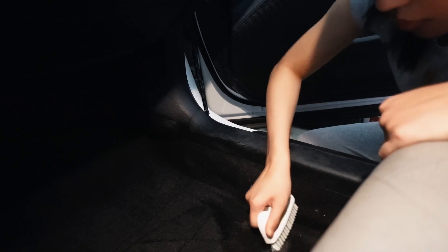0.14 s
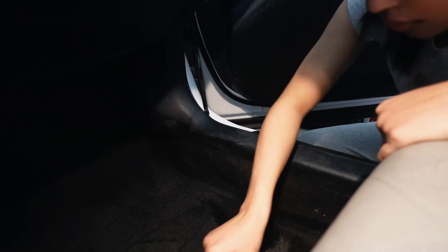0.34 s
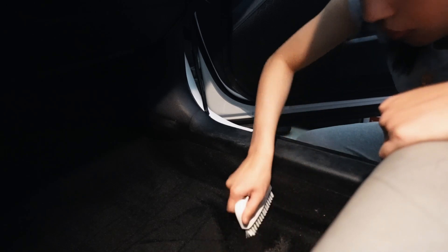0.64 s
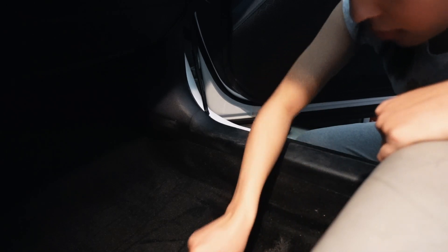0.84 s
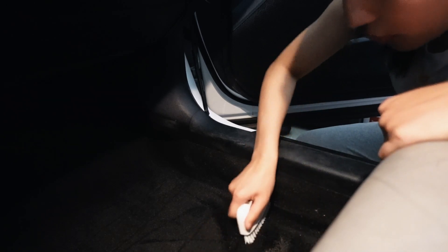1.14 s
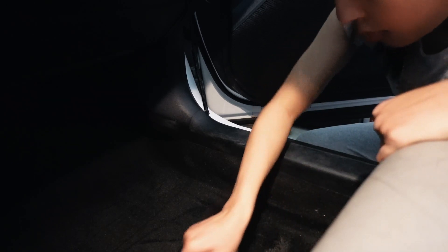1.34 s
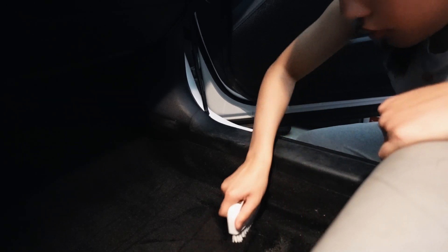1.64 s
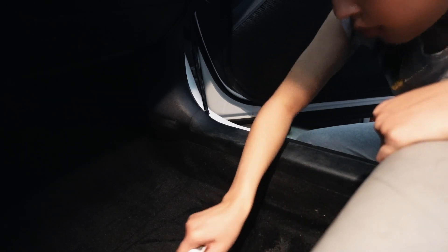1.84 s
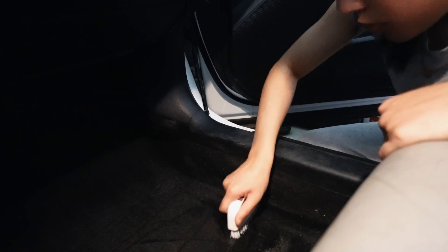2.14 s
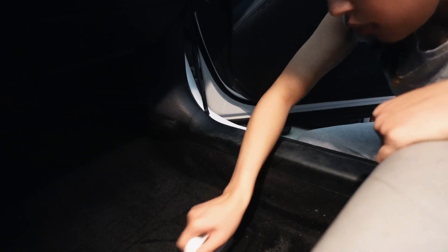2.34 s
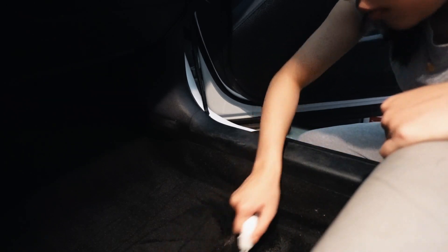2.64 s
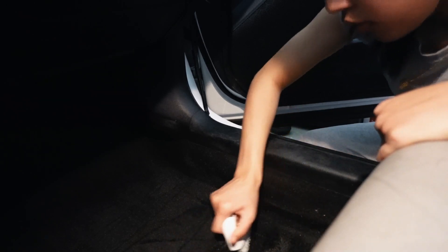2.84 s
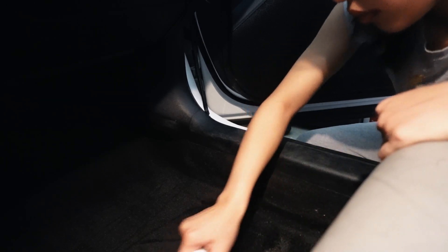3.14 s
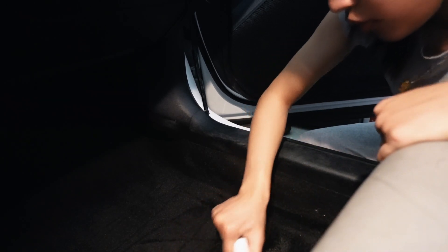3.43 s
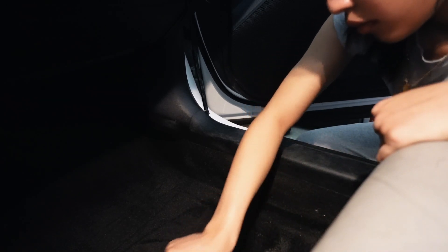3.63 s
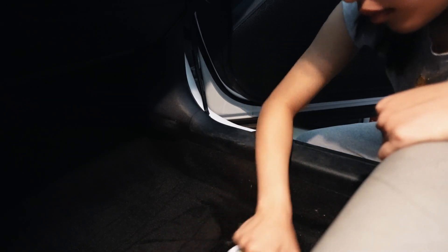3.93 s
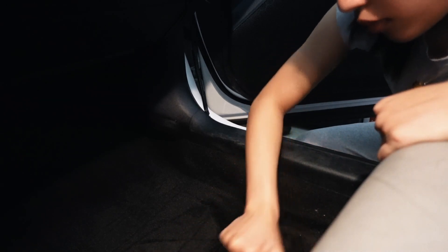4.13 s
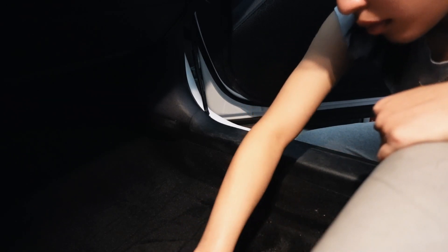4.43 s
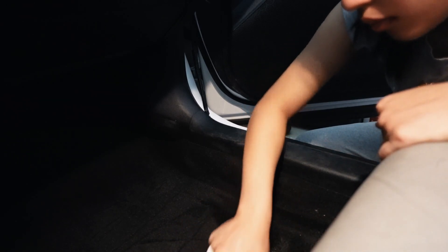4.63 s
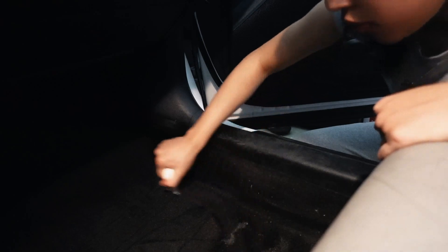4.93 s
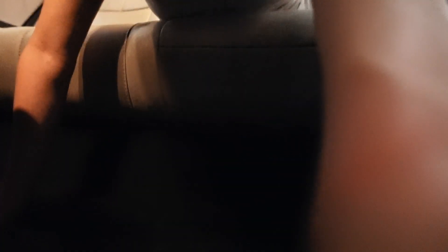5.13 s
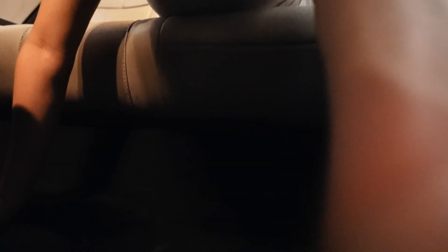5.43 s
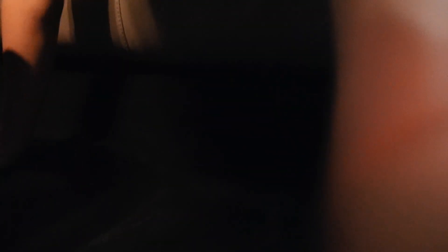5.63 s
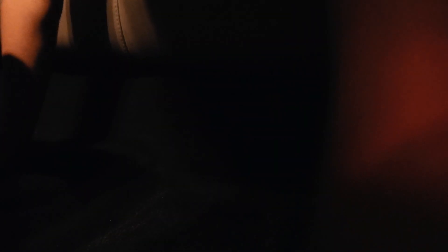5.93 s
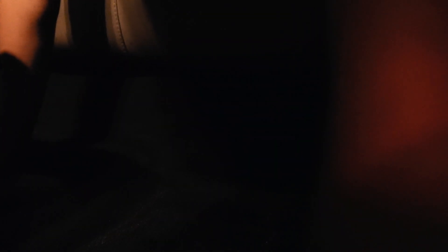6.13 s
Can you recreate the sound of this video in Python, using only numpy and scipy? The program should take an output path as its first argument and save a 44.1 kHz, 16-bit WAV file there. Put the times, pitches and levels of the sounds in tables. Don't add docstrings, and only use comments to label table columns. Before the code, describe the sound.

Coarse, dry bristle strokes fill a close stereo microphone inside a small padded car cavity, each swelling and easing with short checks at the turns. The scrubbing ends suddenly, dropping to a quiet garage with a very soft, rapid hollow chug and low hum. One light thud comes first, then a tight cluster of plastic-and-floor knocks with a short echo, and finally a tiny whisper of cloth.

```python
import sys
import numpy as np
from scipy import signal
from scipy.fft import rfft, irfft, next_fast_len
from scipy.io import wavfile
from scipy.ndimage import uniform_filter1d

SR = 44100
rng = np.random.default_rng(int(sys.argv[2]) if len(sys.argv) > 2 else 0)


def generate_wav(sig):
    pcm = np.round(np.clip(np.atleast_2d(sig).T, -1, 1) * 32767).astype(np.int16)
    wavfile.write(sys.argv[1], SR, pcm)


def how_loud(loudness_db):
    steps = np.asarray(loudness_db, float) / 20
    return 10 ** steps


N = 276493
T = np.arange(N) / SR
CHANGE_S = 5.066
LAST_DB = -42.5

# full speed t/s, effort level/dB, easing t/s, effort level/dB, depth in the pile level/dB
STROKES = [(.063, -30, 0.21, -32.5, -2.5), (.296, -27.5, 0.451, -28.5, -1), (0.591, -30, 0.71, -31.5, .1),
           (0.808, -24, 0.96, -28, 0.2), (1.081, -29, 1.199, -30, -0.9), (1.31, -24.5, 1.457, -26.5, 0),
           (1.57, -31, 1.706, -31.5, -0.2), (1.815, -25.5, 1.951, -28.5, 0.3), (2.01, -38, 2.03, -39.5, .1),
           (2.091, -31.5, 2.198, -33.5, -1.7), (2.325, -26, 2.48, -26.5, 0.5),
           (2.625, -38.5, 2.675, -35.5, 0.5), (2.677, -31, 2.758, -36.5, -1.3),
           (2.931, -30, 3.115, -28.5, 0.5), (3.29, -32.5, 3.396, -38, .1), (3.513, -28, 3.756, -29, -1.4),
           (3.942, -33.5, 4.075, -35.5, 1), (4.242, -31.5, 4.455, -33, 0.6), (4.635, -33, 4.74, -31.5, 1),
           (4.82, -27.5, 5, -32, -0.2)]
# t/s, effort at rest level/dB,
# then push on the pan, weight and fizz of the tips, each level/dB re effort
TURNS = [(0, -47, -5, -24.5, -5.5), (0.243, -45, -6, -27.5, -7.5), (.49, -49.5, -2.5, -25, -6),
         (0.742, -48.5, -7, -26.5, -8), (0.989, -48, -3.5, -27, -6.5), (1.241, -48, -7, -25, -8),
         (1.49, -48, -3.5, -28, -6.5), (1.727, -50, -6, -24, -8.5), (1.994, -42, -3, -22, -10),
         (2.045, -42.5, -5.5, -26, -6.5), (2.226, -51.5, -5.5, -25.5, -7.5),
         (2.535, -48.5, -4, -24.5, -6.5), (2.655, -42, -0.5, -24.5, -8), (2.816, -45.5, -6.5, -31.5, -7.5),
         (3.183, -52.5, -3, -20, -8), (3.421, -53.5, -7, -28, -10), (3.84, -56, -4.5, -25, -8.5),
         (4.141, -51, -5, -30, -7.5), (4.517, -57.5, -4, -27, -7), (4.78, -29, -2.5, -28.5, -5.5)]
# t/s, jump level/dB
BITES = [(0.053, 0), (.285, -0.5), (.565, 0), (0.794, -0.5), (1.30, 0.5), (1.555, 2.5), (1.802, 4),
         (2.31, 4), (2.92, 3.5), (3.262, 4), (3.50, 0.5)]
# level/dB added at turn, half speed, full speed, middle, easing, half eased
EFFORT_SHAPE = (-1.25, 1.5, -0.26, 0.7, -0.04, 0)
PUSH_SHAPE = (-1, -4.5, -0.5, -.5, 1.5, 2)
WEIGHT_SHAPE = (12, -4, -5.5, 1.9, 2, 10.5)
FIZZ_SHAPE = (-.5, -.5, -1.4, .8, .6, 1)
DEPTH_SHAPE = (0.15, -.3, -0.34, .1, 0.23, .3)
# f/Hz, level/(dB per Hz)
SCRUB_SPECTRUM = [(15, -71.5), (25, -42), (64, -41.5), (99, -16), (184, -8), (474, -2.5), (813, -12.5),
                  (930, -12), (1190, -11.5), (1320, -8.5), (1470, -9.5), (2810, -10), (4820, -10),
                  (10000, -17.5), (15800, -32)]
# f/Hz, width/Hz, lift or dip level/dB
FOOTWELL_MODES = [(159, 26, -2.5), (280, 13, 3), (307, 9.3, -6), (491, 23, 3.5), (780, 150, -2.5),
                  (915, 140, 4), (1184, 51, -5.5), (1304, 59, 3.5), (1804, 96, 3), (2270, 91, 2),
                  (2721, 60, 5), (2934, 66, 2), (3600, 370, 3)]
# f/Hz, side re mid level/dB
FOOTWELL_SPREAD = [(60, -21), (100, -27), (180, -33), (310, -23.5), (550, -22), (950, -13), (1650, -15),
                   (2860, -12), (4970, -11), (8640, -9.5), (15000, -5)]
# f/Hz, left re right level/dB
SCRUB_LEAN = [(200, 0.5), (950, -0.3), (3800, .2), (15000, 1.5)]
# t/s, level/dB
DRAG = [
    (4.88, -55),
    (4.91, -36),
    (4.96, -35),
    (5.0, -34.5),
    (5.04, -35.5),
    (5.062, -39),
]
# f/Hz, width/Hz, level/dB
SILL_MODES = [(757, 130, -2), (1083, 140, -5)]
# t/s, peak level/dB, f/Hz
BUMPS = [
    (1.789, -53.5, 95),
    (2.1, -50, 75),
    (2.655, -33, 110),
    (3.329, -52, 108),
    (3.465, -54, 62),
    (1.09, -57, 60),
]
# f/Hz, level/(dB per Hz)
AIR_SPECTRUM = [(15, -48.5), (25, -23), (68, -15), (110, -10.5), (269, -12), (514, -5), (620, -4),
                (770, -12), (982, -18.5), (1060, -14.5), (2330, -26), (13500, -39), (15800, -47.5)]
# f/Hz, side re mid level/dB
AIR_SPREAD = [(60, -23.5), (180, 0.5), (550, -1), (1650, 4.5), (4970, 0), (15000, -6.5)]
# t/s, peak level/dB, f/Hz
CATCHES = [
    (1.739, -39.5, 1490),
    (2.633, -29.5, 3940),
    (2.638, -29, 443),
    (2.664, -39, 300),
]
# f/Hz, rms level/dB
HUM = [(64.6, -73)]
# t/s, peak level/dB, f/Hz
STRAY_BEATS = [
    (5.076, -46, 557),
    (5.091, -42, 407),
    (5.102, -43, 470),
    (5.179, -45, 414),
    (5.202, -39.5, 497),
    (5.254, -53, 530),
    (5.52, -50, 480),
    (5.845, -44, 426),
]
SKIPPED_BEATS = [2, 4, 10, 18, 32]
# t/s, hollow thud peak level/dB, thud f/Hz, clack peak level/dB, brightness/(dB per octave)
KNOCKS = [(5.1186, -20.5, 442.4, -35, 11.5), (5.122, -53, 436, -38, 6), (5.130, -48, 436, -42.5, -3),
          (5.138, -44, 503, -63.5, -3), (5.151, -36.5, 414, -59, -3.5), (5.5491, -17, 439, -25.5, -1),
          (5.552, -29, 340, -19.5, -1), (5.557, -18.5, 386, -16.5, 0), (5.564, -21, 427, -24.5, 2.5),
          (5.570, -26, 397, -41.5, 0), (5.582, -34, 430, -25, -2), (5.588, -30, 446, -25.5, -6),
          (5.595, -42, 420, -31.5, 1), (5.600, -51, 422, -36, -7.5), (5.604, -34, 443, -34, -1),
          (5.647, -38.5, 470, -45, -10)]
# multiple of thud f, level/dB, t60/s
THUD_MODES = [(1, 2.5, 0.043), (1.55, -9, 0.054), (.35, -11, 0.044)]
# f/Hz, level/dB, t60/s
CLACK_MODES = [(890, 1, 0.016), (1160, 0.5, 0.019), (1510, 5.5, 0.013), (2020, -3.5, 0.0092),
               (2350, 11.5, 0.0099), (2870, -6, 0.0081), (3110, 5, 0.011), (4120, 4.5, 0.012),
               (4630, -0.5, 0.0088), (5850, 0, 0.0055), (6400, -14, 0.0092), (8000, -6.5, 0.007),
               (10400, -23, .004), (13500, -29.5, .003)]
# f/Hz, side re mid level/dB
KNOCK_SPREAD = [(300, -22), (1000, -12), (3000, -5)]
# f/Hz, level/(dB per Hz)
WALLS_SPECTRUM = [(150, -11), (450, -1.5), (800, 2.5), (1170, 5), (1350, -3), (2500, -9), (5000, -10.5),
                  (12000, -24)]
# t/s, level/dB
RUSTLE = [
    (5.83, -83),
    (5.85, -64),
    (5.884, -63),
    (6.02, -84),
]
# f/Hz, level/(dB per Hz)
CLOTH_SPECTRUM = [(900, -19), (1420, -3.5), (1650, -13), (1930, -5), (2400, -6.5), (2900, -15.5),
                  (3900, -8), (6000, -13), (8500, -14.5), (9600, -29), (10700, -21), (15000, -39.5)]


def evened(x):
    return x / np.sqrt(np.mean(x ** 2) + 1e-20)


def read(points, hz):
    f, value = np.transpose(points)
    return np.interp(np.log(hz + 1), np.log(f + 1), value)


def colour(x, gain):
    size = next_fast_len(N)
    return irfft(rfft(x, size) * gain(np.fft.rfftfreq(size, 1 / SR)), size)[..., :N]


def under(hz, edge_hz):
    return 1 / np.sqrt(1 + (hz / edge_hz) ** 8)


def over(hz, edge_hz):
    return np.sqrt(1 - under(hz, edge_hz) ** 2)


def resonances(hz, modes):
    return [(db, 1 / (1 + (2 * (hz - f) / width) ** 2)) for f, width, db in modes]


def envelope(points):
    return how_loud(np.interp(T, *np.transpose(points), -120, -120))


def add(mix, s, sound):
    part = mix[..., round(s * SR):][..., :sound.shape[-1]]
    part += sound[..., :part.shape[-1]]


def snaps(per_s, uneven_db):
    size = how_loud(uneven_db * np.minimum(rng.exponential(1, N), 4))
    size *= rng.choice([-1., 1.], N)
    return evened(size * (rng.random(N) < per_s / SR))


def cabin(x, beside, t60, spread, wet_db, turns_per_s=4., places=3):
    t = np.arange(4096) / SR
    tails = rng.standard_normal((places, 2, len(t))) * how_loud(-60 * t / t60) * (t > .001)
    tails /= np.linalg.norm(tails, axis=2, keepdims=True)
    both = np.array([x, beside])
    wet = 0
    for k, tail in enumerate(tails):
        share = np.sqrt(2 / places) * np.cos(np.pi * (turns_per_s * T + k / places))
        wet = wet + signal.oaconvolve(both * share, tail, axes=1)[:, :N]
    mid, side = (both + how_loud(wet_db) * wet) / np.sqrt(1 + how_loud(2 * wet_db))
    side = colour(side, lambda hz: how_loud(read(spread, hz)))
    return np.array([mid + side, mid - side])


def stages():
    turn, rest_db, push_db, weight_db, fizz_db = np.transpose(TURNS)
    full, full_db, ease, ease_db, depth_db = np.transpose(STROKES)
    end, end_db = np.append(turn[1:], CHANGE_S), np.append(rest_db[1:], LAST_DB)

    def six(a, b, c, d):
        return np.array([a, (a + b) / 2, b, (b + c) / 2, c, (c + d) / 2]).T

    times = np.append(six(turn, full, ease, end), CHANGE_S)
    effort_db = np.append(six(rest_db, full_db, ease_db, end_db) + EFFORT_SHAPE, LAST_DB)
    full_stop_db = 18
    off, on = np.clip([full_db - rest_db, ease_db - end_db], 0, full_stop_db) / full_stop_db
    one = np.ones_like(off)
    stop = np.array([off, off, one, one, one, on]).T
    controls = [(push_db, PUSH_SHAPE), (fizz_db, FIZZ_SHAPE), (weight_db, WEIGHT_SHAPE), (depth_db, DEPTH_SHAPE)]
    layers = [np.append(db[:, None] + stop * shape, db[-1] + shape[0]) for db, shape in controls]
    return times, effort_db, *layers


def slips():
    s, effort_db, push_db, fizz_db, weight_db, depth_db = stages()

    def body(hz):
        lift_db = sum(db * curve for db, curve in resonances(hz, FOOTWELL_MODES))
        chirp = np.exp(1j * np.pi * 0.0023 * hz ** 2 / 8000)
        return how_loud(read(SCRUB_SPECTRUM, hz) + lift_db) * chirp

    def layer(clicks, band):
        return evened(colour(clicks, lambda hz: body(hz) * band(hz)))

    def level(db):
        return how_loud(np.interp(T, s, db))

    weight = layer(snaps(800, 2.), lambda hz: under(hz, 130))
    push = layer(snaps(2500, 2.0), lambda hz: over(hz, 150) * under(hz, 800))
    pile = layer(snaps(10000, 2.1), lambda hz: over(hz, 800) * under(hz, 6830))
    pile = pile + (level(depth_db) - 1) * colour(pile, lambda hz: under(hz, 2200))
    fizz = layer(snaps(16000, 1.5), lambda hz: over(hz, 6500))
    return level(effort_db) * (pile + level(push_db) * push + level(fizz_db) * fizz + level(weight_db) * weight)


def patchy(pair):
    patch_db, patch_bins, patch_frames = 1.6, 5, 24
    z = signal.stft(pair, nperseg=512, noverlap=384)[2]
    field = rng.standard_normal(z.shape[:0:-1]).T
    field = uniform_filter1d(field, size=patch_bins, axis=0)
    field = evened(uniform_filter1d(field, size=patch_frames, axis=1))
    return signal.istft(z * how_loud(patch_db * field), nperseg=512, noverlap=384)[1][:, :N]


def sill_drag():
    drag = colour(snaps(2000, 2.7), lambda hz: sum(how_loud(db) * curve for db, curve in resonances(hz, SILL_MODES)))
    return how_loud(-2.0) * envelope(DRAG) * evened(drag)


def bumps():
    out, t = np.zeros(N), np.arange(1800) / SR
    for s, db, hz in BUMPS:
        add(out, s, how_loud(db) * np.sin(2 * np.pi * hz * t) * np.hanning(len(t)))
    return out


def scrubbing():
    flutter = how_loud(.7 * evened(uniform_filter1d(rng.standard_normal(N), 400)))
    flutter *= how_loud(sum(db * np.sign(T - s) * np.exp(-abs(T - s) / 0.022) for s, db in BITES))
    direct, beside = patchy(flutter * np.array([slips(), slips()]))
    direct = direct + sill_drag() + bumps()
    left, right = cabin(direct, beside, 0.055, FOOTWELL_SPREAD, -9.0, 7.)
    heard = np.array([colour(left, lambda hz: how_loud(read(SCRUB_LEAN, hz) / 2)),
                      colour(right, lambda hz: how_loud(-read(SCRUB_LEAN, hz) / 2))])
    return heard * np.clip((CHANGE_S - T) / 0.0048, 0, 1)


def air():
    mid, side = rng.standard_normal((2, N))
    side = colour(side, lambda hz: how_loud(read(AIR_SPREAD, hz)))
    both = colour(np.array([mid + side, mid - side]), lambda hz: how_loud(read(AIR_SPECTRUM, hz)))
    return how_loud(-61) * evened(both) * how_loud(np.array([[-1.], [1.]]))


def catches():
    out, t = np.zeros(N), np.arange(-300, 300) / SR
    for s, db, hz in CATCHES:
        wobble = 1 + 1.3 * uniform_filter1d(rng.standard_normal(len(t)), size=12)
        add(out, s + t[0], how_loud(db) * np.hanning(len(t)) * wobble * np.sin(2 * np.pi * hz * t))
    return out


def beats():
    first_s, per_s = 5.1015, 29.91
    usual_db, vary_db, skip_db = -46.5, 1.2, -11
    low_hz, high_hz = 480, 600
    k = np.arange(int((N / SR - first_s) * per_s) + 1)
    strong, high = rng.random((len(k), 2)).T
    db = usual_db + vary_db * (2 * strong - 1) + skip_db * np.isin(k, SKIPPED_BEATS)
    return list(zip(first_s + k / per_s, db, low_hz + (high_hz - low_hz) * high))


def from_left(pair):
    lag_s = 0.00033
    return np.array([pair[0], colour(pair[1], lambda hz: np.exp(-2j * np.pi * hz * lag_s))])


def machine():
    out, t = np.zeros((2, N)), np.arange(560) / SR
    balance = how_loud(np.array([[-1.3], [1.3]]))
    for s, db, hz in beats() + STRAY_BEATS:
        hollow = np.sin(2 * np.pi * hz * t) + 0.24 * np.sin(2 * np.pi * 1.185 * hz * t)
        add(out, s - .003, how_loud(db) * np.hanning(len(t)) * hollow * balance)
    hum = sum(np.sqrt(2) * how_loud(db) * np.sin(2 * np.pi * hz * T) for hz, db in HUM)
    return from_left(out) + hum


def ring(modes, rise_s, seconds=.1):
    t = np.arange(round(seconds * SR)) / SR
    x = sum(how_loud(db - 60 * t / t60) * np.sin(2 * np.pi * hz * t) for hz, db, t60 in modes)
    x *= 1 - np.exp(-(t / rise_s) ** 2)
    return x / abs(x).max()


def walls(x):
    t = np.arange(SR // 2) / SR
    tail = rng.standard_normal((2, len(t))) * how_loud(-60 * t / 0.98) * (t > .012)
    wet = signal.fftconvolve(x[None], tail / np.linalg.norm(tail[0]), axes=1)[:, :N]
    return colour(wet, lambda hz: how_loud(read(WALLS_SPECTRUM, hz) - 14.0))


def knocks():
    out = np.zeros(N)
    detune = rng.uniform(0.94, 1.15, (len(KNOCKS), len(CLACK_MODES)))
    for (s, thud_db, thud_hz, clack_db, tilt_db), shifts in zip(KNOCKS, detune):
        floor = [(thud_hz * k, db, t60) for k, db, t60 in THUD_MODES]
        add(out, s, how_loud(thud_db) * ring(floor, 0.0015))
        plastic = [(hz * k, db + tilt_db * np.log2(hz / 2500), t60)
                   for (hz, db, t60), k in zip(CLACK_MODES, shifts)]
        grit = 1 + 1.6 * uniform_filter1d(rng.standard_normal(round(.1 * SR)), size=9)
        add(out, s, how_loud(clack_db - 2.0) * grit * ring(plastic, 0.00027))
    out = colour(out, lambda hz: 1 / np.sqrt(1 + (hz / 7530) ** 6))
    heard = cabin(out, out, .022, KNOCK_SPREAD, -10., 12.)
    return heard * how_loud(np.array([[-2.4], [2.4]])) + walls(out)


def rustle():
    fibres = evened(colour(snaps(2500, 3.2), lambda hz: how_loud(read(CLOTH_SPECTRUM, hz))))
    fibres = envelope(RUSTLE) * fibres
    return cabin(fibres, fibres, .05, FOOTWELL_SPREAD, -0.5)


def scene():
    second = T > CHANGE_S
    return scrubbing() + air() + catches() + second * machine() + knocks() + rustle()


def band_limit(x):
    return signal.sosfilt(signal.butter(12, 15970, fs=SR, output="sos"), x)


def record(dry):
    mix = colour(dry, lambda hz: over(hz, 33))
    return band_limit(mix)


dry = scene()
out = record(dry)
generate_wav(out)
```